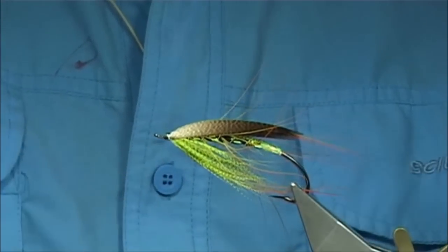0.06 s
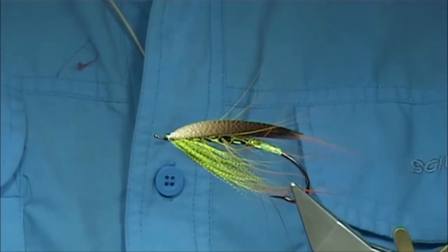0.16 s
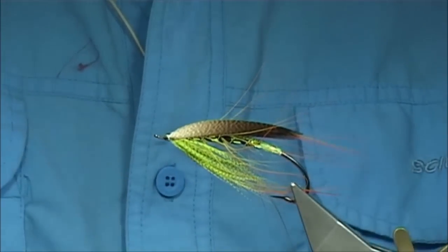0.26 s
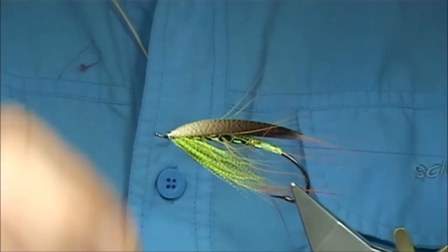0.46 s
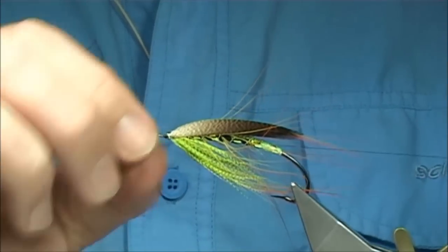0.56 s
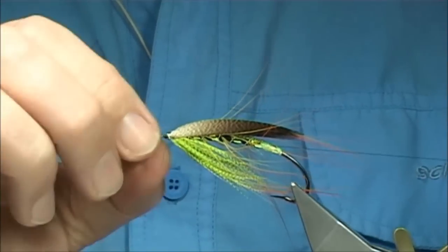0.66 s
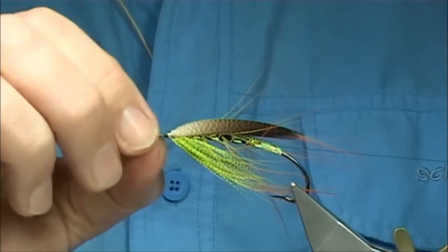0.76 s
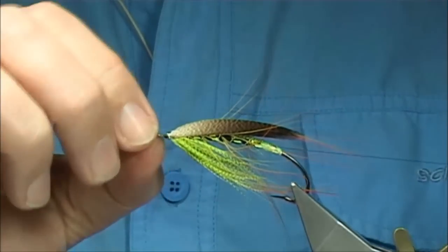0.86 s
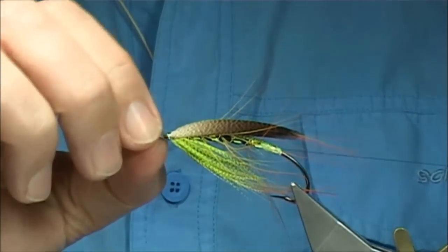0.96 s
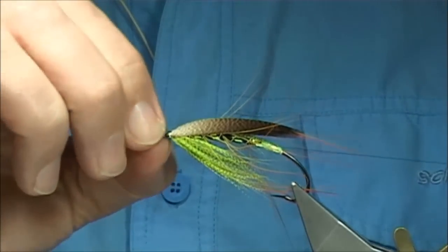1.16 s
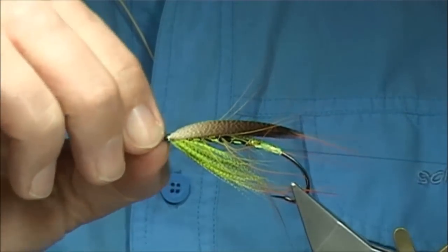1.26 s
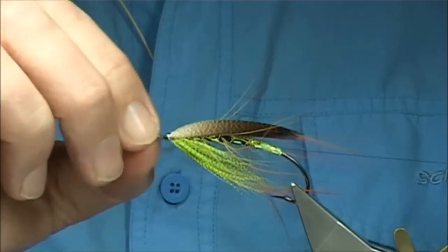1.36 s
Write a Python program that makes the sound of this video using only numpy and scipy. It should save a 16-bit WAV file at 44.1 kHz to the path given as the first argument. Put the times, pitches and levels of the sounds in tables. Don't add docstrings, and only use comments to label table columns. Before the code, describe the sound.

A small steel tool clatters on a wooden bench, close to the microphone. Quiet room air, low rumble and faint mains hum run throughout. At about 0.24 s a light click starts, followed by denser bright clicks at 0.29 and 0.34 s, the loudest near 0.35 s, with dull knocks and short room echo. It settles by 0.4 s, ticks again at 0.49 s, then only tiny snaps near 1.17 s.

```python
import sys
import numpy as np
from scipy import signal
from scipy.io import wavfile
from scipy.ndimage import uniform_filter1d

SR = 44100
rng = np.random.default_rng(int(sys.argv[2]) if len(sys.argv) > 2 else 0)


def gain_from_db(level_db):
    decades = np.asarray(level_db, float) / 20
    return 10 ** decades


def put_to_file(sound):
    columns = np.atleast_2d(sound).T
    safe = np.clip(columns, -1, 1)
    whole_steps = np.round(safe * 32767)
    wavfile.write(sys.argv[1], SR, whole_steps.astype(np.int16))


N = 61739

# start in seconds, peak in dB, main ring in Hz, upper ring in dB,
# swell in milliseconds.
STRIKES = [(.2445, -18, 4820, -14.5, 0.49), (.2456, -16, 4830, -9.5, 0.38),
           (.2483, -22.5, 4500, -19.5, 0.17), (.2903, -27.5, 3900, -0.5, .3),
           (.2909, -23, 5120, -3.5, 0.46), (.2970, -16, 5070, -13.5, 0.41), (.2995, -23, 5060, -6.5, .45),
           (.3038, -23, 5140, -13, 0.44), (.3090, -31, 4950, -19, .5), (.2925, -27.5, 3700, -2, 0.42),
           (.3347, -16.5, 4300, -6, 0.16), (.3363, -13, 5200, -8, 0.25), (.3383, -21.5, 3840, -7.5, 0.28),
           (.3355, -21, 5500, -5, 0.37), (.3462, -8.5, 4730, -18.5, 0.31), (.3601, -27.5, 4770, -20, .6),
           (.3675, -19, 4700, -11, 0.095), (.3777, -16, 4760, -13.5, 0.12), (.3943, -30, 3200, -11, 0.64),
           (.3951, -24.5, 4930, -10, 0.27), (.4030, -39, 5000, -17, 0.4), (.4077, -32.5, 4950, -15, 0.74),
           (.4849, -19, 4800, -19, 0.12), (.4888, -32.5, 4900, -15, 0.55)]
# pitch in Hz, level in dB, time to fall 60 dB in seconds.
UPPER_RINGS = [(6270, -13, 0.0013), (8170, 7, 0.0028), (11020, -4, 0.0042), (15300, -21, 0.0035)]
# time in seconds, level in dB.
RATTLE_LEVEL = [
    (.2435, -68),
    (0.246, -46.5),
    (.2895, -56),
    (0.2905, -35.5),
    (0.336, -53),
    (.336, -33),
    (0.389, -47),
    (0.437, -53.5),
    (.47, -82),
]
# start in seconds, peak in dB, pitch in Hz,
# time to fall 60 dB in seconds.
KNOCKS = [(.2450, -42, 1600, 0.069), (.2455, -25, 3090, 0.0083), (.2450, -31.5, 3620, 0.006),
          (.2465, -48, 11250, 0.032), (.2490, -30.5, 2500, 0.024), (.2460, -29.5, 3400, 0.0067),
          (.2560, -41, 5000, .015), (.2460, -50.5, 573, 0.053), (.2910, -25.5, 890, 0.0081),
          (.2928, -28.5, 2280, 0.013), (.2915, -39.5, 202, 0.051), (.2915, -36.5, 580, .015),
          (.2962, -25.5, 540, 0.017), (.2995, -32, 390, 0.018), (.3025, -32, 504, 0.017),
          (.3050, -29.5, 1650, 0.014), (.3155, -30, 458, 0.021), (.3190, -44.5, 1800, 0.076),
          (.3190, -41, 2020, 0.054), (0.3335, -38.5, 135, 0.12), (.3350, -33, 2300, 0.019),
          (.3375, -39, 1100, 0.012), (.3350, -33.5, 595, 0.011), (.3462, -21, 555, 0.0053),
          (.3463, -21.5, 1260, 0.0038), (.3463, -19, 1850, 0.0031), (.3464, -14.5, 8330, 0.0033),
          (0.38, -24, 6300, 0.0015), (.3463, -27, 2740, 0.0034), (0.3, -22, 5800, 0.0059),
          (.3464, -24, 11600, 0.0052), (.2920, -39.5, 113, 0.084), (.3500, -41, 268, 0.06),
          (.3780, -48, 1823, 0.012), (.3800, -39, 3200, 0.015), (.3815, -37, 2600, 0.023),
          (.3650, -40, 2750, 0.031), (.4135, -40, 3050, 0.012), (.4060, -46, 2900, 0.013),
          (.4090, -45, 2550, 0.027), (.4205, -47, 5000, .008), (.4278, -44, 4950, 0.0065),
          (.4870, -42.5, 2680, 0.027), (.4915, -46, 2400, 0.026), (.5005, -44, 2400, 0.021),
          (0.56, -56, 2000, .05), (.5165, -50.5, 2200, 0.043), (.5190, -46, 234, .03)]
# start in seconds, rms level in dB, time to fall 60 dB in seconds.
THUDS = [
    (.2450, -59.5, 0.043),
    (.2905, -39, 0.092),
    (.3347, -36.5, 0.051),
    (.3462, -45.5, 0.051),
    (.4848, -54, 0.071),
]
# start in seconds, peak in dB, centre in Hz, width in Hz,
# length in milliseconds.
TICKS = [(.1325, -57, 10500, 7000, 1.5), (.7170, -62, 3500, 3000, 2), (1.0060, -66, 5000, 6000, 9),
         (1.1738, -64, 4500, 5000, .4), (1.1770, -50, 300, 500, .6), (1.1460, -47, 150, 150, 3),
         (.2543, -38, 5500, 4000, .5), (.3533, -33, 10000, 3000, .5), (.2428, -42, 6000, 8000, 1.2),
         (.4992, -53, 6500, 3000, .6), (.4872, -42, 3500, 3000, .4), (.4848, -40, 13000, 5000, .3)]
# start in seconds, peak in dB, length in milliseconds.
SNAPS = [
    (1.1737, -45, 0.067),
    (1.1767, -42, 0.071),
    (0.9, -55, .08),
]
# pitch in Hz, time to fall 60 dB in seconds.
ROOM_DECAY = [(200, 0.086), (600, 0.3), (2000, 0.37), (4500, 0.29), (8000, 0.26), (14000, 0.18)]
# pitch in Hz, level in dB.
ROOM_TONE = [(200, 5.5), (1000, 3.5), (2500, -1.5), (5000, -4), (8000, -2), (14000, 3.5)]
# pitch in Hz, level in dB per Hz.
AIR_TONE = [(15, -48), (25, 7), (40, -1), (75, -3.5), (102, 0), (242, -2.5), (754, -12.5), (818, -15),
            (14800, -32), (16000, -26.5)]
# time in seconds, dB above the mean.
RUMBLE = [(0, -3), (.08, -1.5), (.22, -2), (.45, 0), (.75, 0.5), (.85, -2.5), (1.0, 0.5), (1.15, -2),
          (1.4, -2)]
# multiple of the mains frequency, rms level in dB.
HUM = [(1, -80), (2, -66), (4, -69.5), (5, -72.5), (7, -77.5), (10, -90), (11, -85.5), (13, -80), (14, -88),
       (16, -88), (17, -80), (20, -83), (40, -82.5)]

CRACK_S, CRACK_HZ = 0.0015, (2050, 12800)
CHATTER_DB, CHATTER_T60_S = -22.5, 0.011
UPPER_RISE_S, STEEL_LOW_HZ = 0.00026, 1910
RATTLE_PER_S, RATTLE_SPREAD_DB, RATTLE_CAP = 3500, 3, 2.5
RATTLE_HZ, RATTLE_CYCLES = (2500, 8000), 1.45
THUD_HZ = (109, 1360)
ROOM_DB, ROOM_GAP_S = -8.5, 0.003
AIR_DB, PATCH_DB, SWELL_DB = -57, 1.5, 1.87
RUMBLE_HZ = (130.7, 700)
MAINS_HZ = 49.9
MIC_LOW_HZ, EDGE_HZ, CUT_HZ, OVER_EDGE_DB = 46, 15600, 16500, -22


def modes(table, t, detune):
    total = np.zeros(len(t))
    for hz, db, t60 in table:
        total += gain_from_db(db - 60 * t / t60) * np.sin(2 * np.pi * hz * detune * t)
    return total


def strike(peak_db, hz, upper_db, swell_ms):
    t = np.arange(0, 0.04, 1 / SR)
    chatter_grit, crack_grit = rng.standard_normal((2, len(t)))
    detune = 1 + 0.016 * rng.standard_normal()
    u = t / (swell_ms * 0.0009)
    main_ring = (u * np.exp(1 - u)) ** 1.56 * np.sin(2 * np.pi * hz * t)
    upper_ring = modes(UPPER_RINGS, t, detune) * (1 - np.exp(-t / UPPER_RISE_S))
    steel = main_ring + gain_from_db(upper_db) * upper_ring

    chatter = gain_from_db(CHATTER_DB - 60 * t / CHATTER_T60_S) * chatter_grit
    chatter[0] = 1
    ring = signal.fftconvolve(chatter, steel)[:len(t)]
    ring = signal.lfilter(*signal.butter(2, STEEL_LOW_HZ, "high", fs=SR), ring)

    burst = crack_grit * np.exp(-t / CRACK_S)
    crack = signal.lfilter(*signal.butter(1, CRACK_HZ, "band", fs=SR), burst)
    return gain_from_db(peak_db) * (ring + gain_from_db(upper_db + 0.5) * crack)


def rattle():
    size = gain_from_db(RATTLE_SPREAD_DB * np.minimum(rng.exponential(1, N), RATTLE_CAP))
    size *= rng.random(N) < RATTLE_PER_S / SR
    pick = rng.integers(0, 16, N)
    t = np.arange(400) / SR
    out = np.zeros(N)
    for k, hz in enumerate(np.geomspace(*RATTLE_HZ, num=16)):
        ping = np.exp(-t * hz / RATTLE_CYCLES) * np.sin(2 * np.pi * hz * t)
        out += signal.oaconvolve(size * (pick == k), ping)[:N]
    s, db = np.transpose(RATTLE_LEVEL)
    level_db = np.interp(np.arange(N) / SR, s, db, left=-200, right=-200)
    return evened(out) * gain_from_db(level_db)


def knock(peak_db, hz, t60):
    t = np.arange(0, 0.12, 1 / SR)
    pair = [(hz, peak_db, t60), (1.061 * hz, peak_db - 3.5, 0.88 * t60)]
    return (1 - np.exp(-t * hz)) * modes(pair, t, 0.96)


def thud(rms_db, t60):
    t = np.arange(0, 0.15, 1 / SR)
    wood_band = signal.butter(2, THUD_HZ, "band", fs=SR, output="sos")
    wood = signal.sosfilt(wood_band, rng.standard_normal(len(t)))
    return gain_from_db(rms_db - 60 * t / t60) * evened(wood)


def tick(peak_db, hz, width_hz, length_ms):
    t = np.arange(0, 0.04, 1 / SR)
    u = t / (length_ms * 0.00069)
    grit = rng.standard_normal(len(t)) * u * np.exp(1 - u)
    body = np.exp(-np.pi * width_hz * t) * np.sin(2 * np.pi * hz * t)
    puff = signal.fftconvolve(grit, body / np.linalg.norm(body))
    return gain_from_db(peak_db) * puff[:len(t)]


def snap(peak_db, length_ms):
    u = np.arange(0, 0.004, 1 / SR) / (length_ms * 0.00096)
    return -gain_from_db(peak_db) * u * (1 - 0.61 * u) * np.exp(1 - u) * 1.75


def room(x):
    taps = np.zeros(SR // 2)
    at = np.arange(round(ROOM_GAP_S * SR), len(taps) - 12, 12)
    shift = rng.integers(0, 12, len(taps))
    sign = rng.choice([-1., 1.], len(taps))
    taps[at + shift[:len(at)]] = sign[-len(at):]
    hz, t, z = signal.stft(taps, SR, nperseg=128)
    fade_db = read(ROOM_TONE, hz)[:, None] - 60 * t / read(ROOM_DECAY, hz)[:, None]
    tail = signal.istft(z * gain_from_db(fade_db), SR, nperseg=128)[1]
    return signal.fftconvolve(x, tail / np.linalg.norm(tail))[:N]


def air():
    frames, hz = N // 512 + 5, np.fft.rfftfreq(2048, 1 / SR)
    a, b, patches = rng.standard_normal((frames, 1025, 3)).T
    patches = uniform_filter1d(patches, size=10, axis=0)
    patches = evened(uniform_filter1d(patches, size=6, axis=1))
    swell = evened(uniform_filter1d(rng.standard_normal(frames), size=8))
    level_db = read(AIR_TONE, hz)[:, None] + PATCH_DB * patches
    level_db = level_db + SWELL_DB * np.outer(hz < 600, swell)

    rumble_db = np.interp((np.arange(frames) - 1) * 512 / SR, *np.transpose(RUMBLE))
    in_rumble = (hz > RUMBLE_HZ[0]) & (hz < RUMBLE_HZ[1])
    level_db = level_db + np.outer(in_rumble, rumble_db)
    noise = signal.istft((a + 1j * b) * gain_from_db(level_db), nperseg=2048, noverlap=1536)[1]
    return gain_from_db(AIR_DB) * evened(noise[:N])


def hum():
    t = np.arange(N) / SR
    total = np.zeros(N)
    for multiple, db in HUM:
        turns = multiple * MAINS_HZ * t + rng.random()
        total += np.sqrt(2) * gain_from_db(db) * np.sin(2 * np.pi * turns)
    return total


def evened(x):
    return x / np.sqrt(np.mean(x ** 2) + 1e-20)


def read(points, hz):
    f, value = np.transpose(points)
    return np.interp(np.log(hz + 1), np.log(f + 1), value)


def add(mix, s, sound):
    part = mix[round(s * SR):][:len(sound)]
    part += sound[:len(part)]


def scene():
    floor = air() + hum()
    near = rattle()
    sources = ((STRIKES, strike), (KNOCKS, knock), (THUDS, thud), (TICKS, tick), (SNAPS, snap))
    for table, source in sources:
        for s, *settings in table:
            add(near, s, source(*settings))
    echo = gain_from_db(ROOM_DB) * room(near)
    return (near + echo + floor)[None]


def lowpass(x, hz):
    taps = signal.firwin(255, hz, window=("kaiser", 9), fs=SR)
    return signal.oaconvolve(x, taps[None], "same")


def roll_off(x):
    return signal.sosfilt(signal.butter(12, 16650, fs=SR, output="sos"), x)


def record(dry):
    heard = signal.lfilter(*signal.butter(2, MIC_LOW_HZ, "high", fs=SR), dry)
    below_edge = lowpass(heard, EDGE_HZ)
    over_edge = lowpass(heard, CUT_HZ) - below_edge
    return roll_off(below_edge + gain_from_db(OVER_EDGE_DB) * over_edge)


dry = scene()
out = record(dry)
put_to_file(out)
```